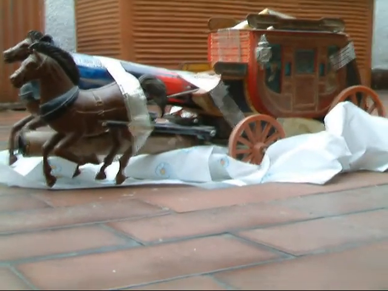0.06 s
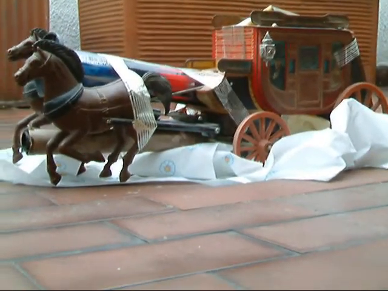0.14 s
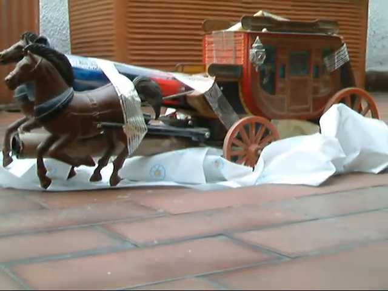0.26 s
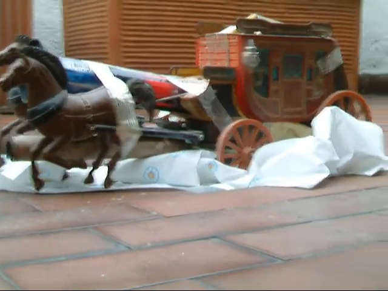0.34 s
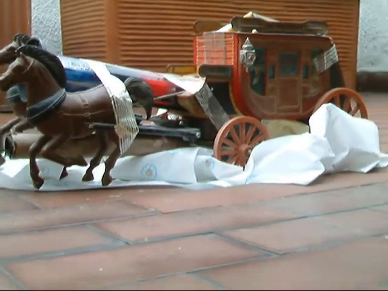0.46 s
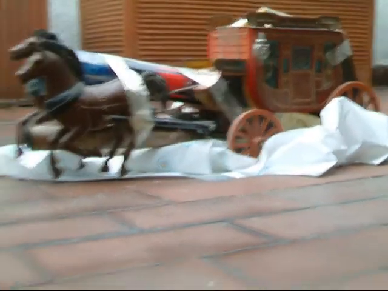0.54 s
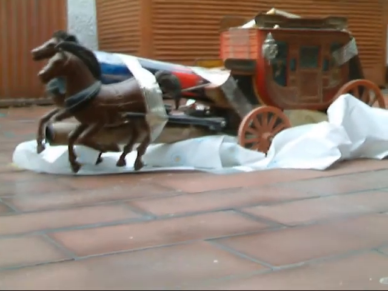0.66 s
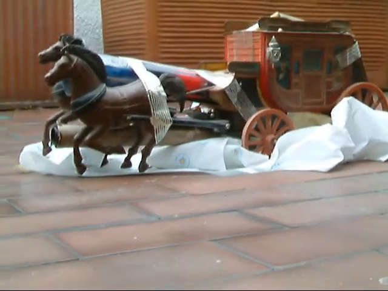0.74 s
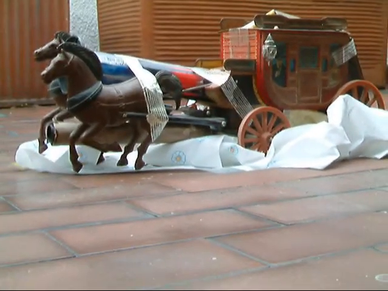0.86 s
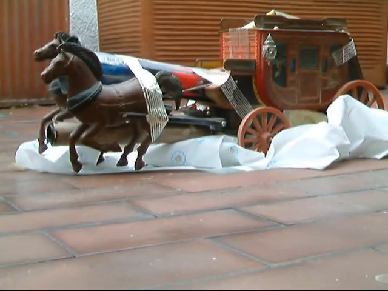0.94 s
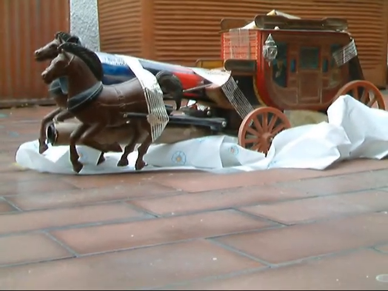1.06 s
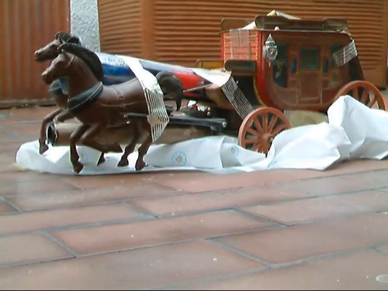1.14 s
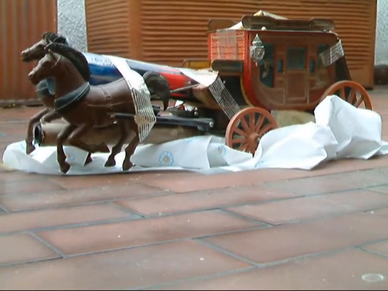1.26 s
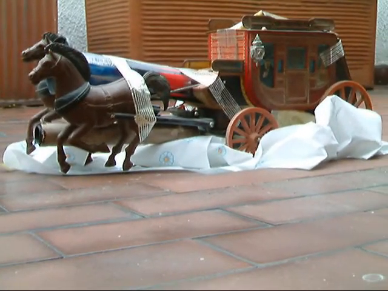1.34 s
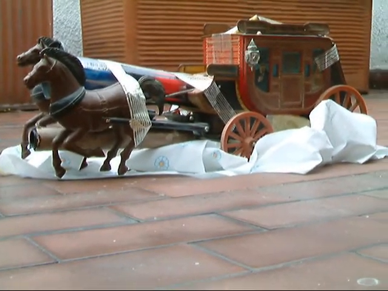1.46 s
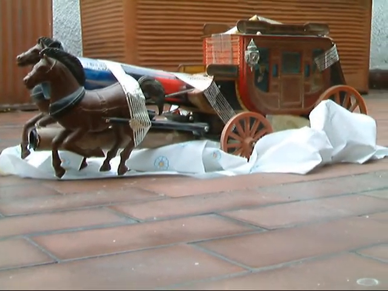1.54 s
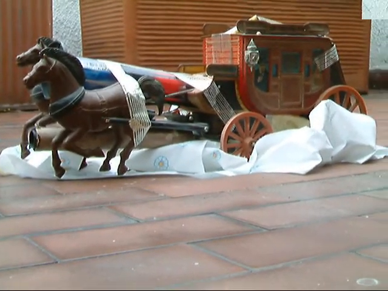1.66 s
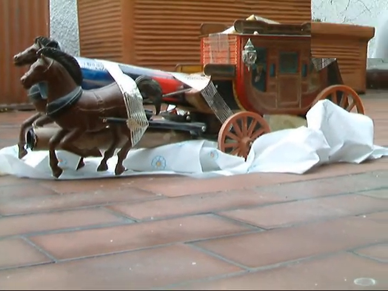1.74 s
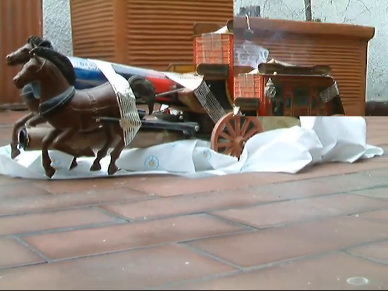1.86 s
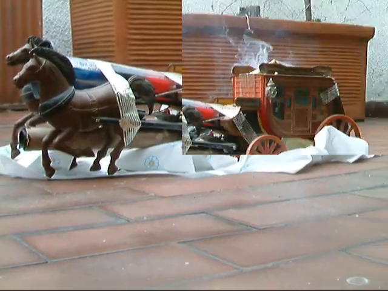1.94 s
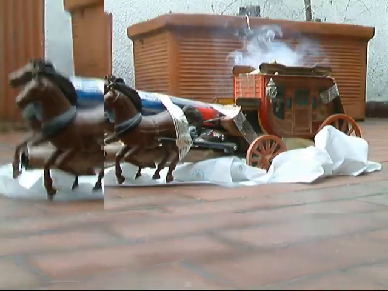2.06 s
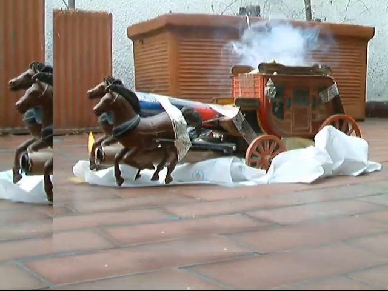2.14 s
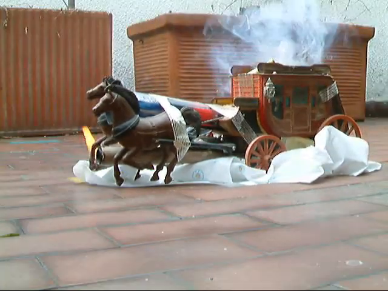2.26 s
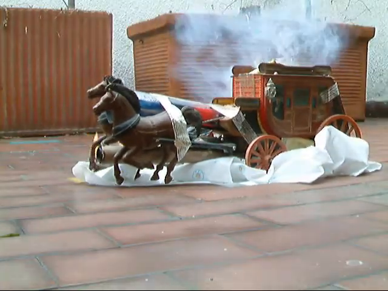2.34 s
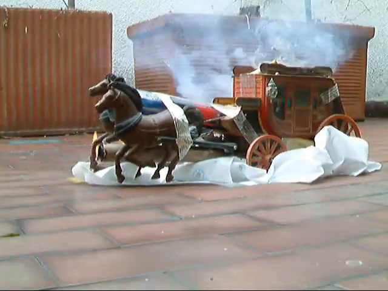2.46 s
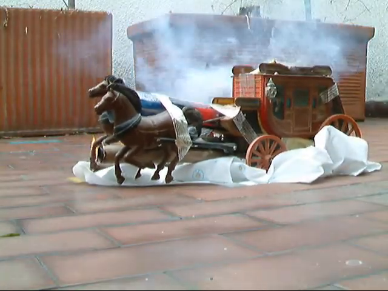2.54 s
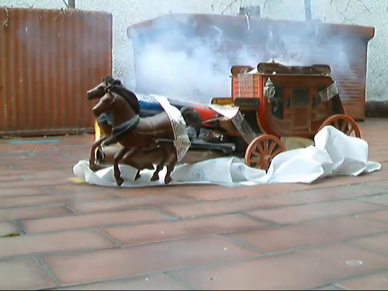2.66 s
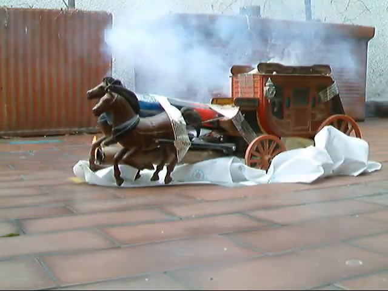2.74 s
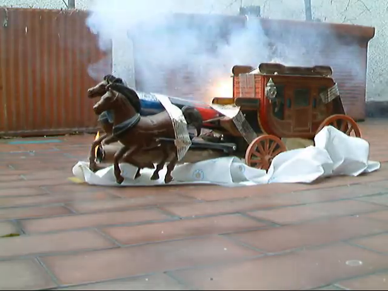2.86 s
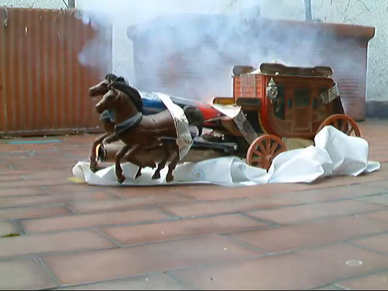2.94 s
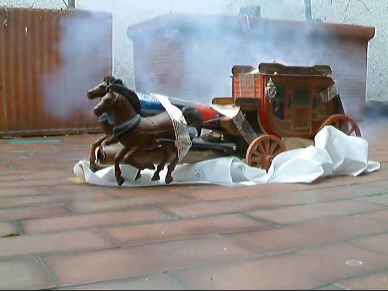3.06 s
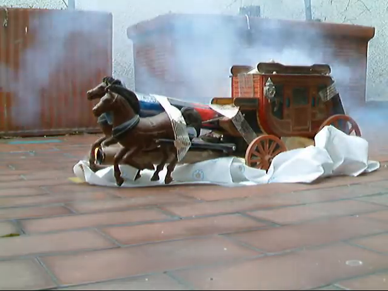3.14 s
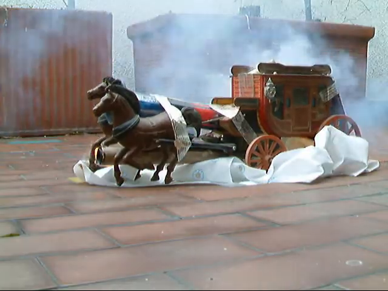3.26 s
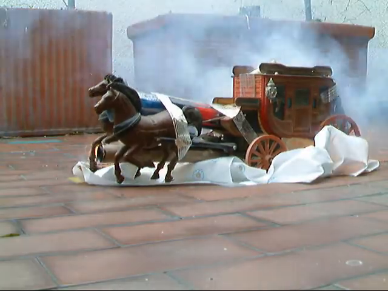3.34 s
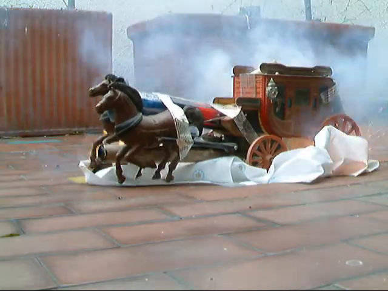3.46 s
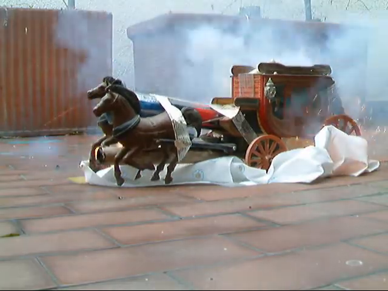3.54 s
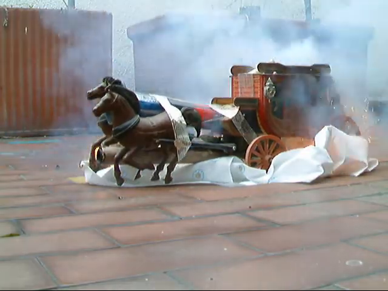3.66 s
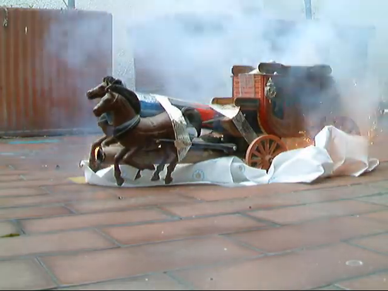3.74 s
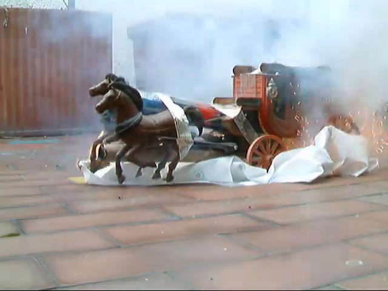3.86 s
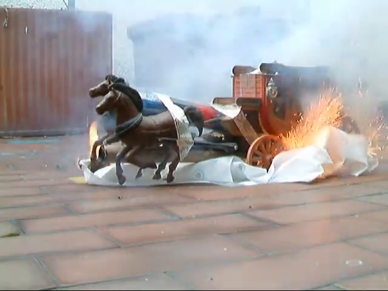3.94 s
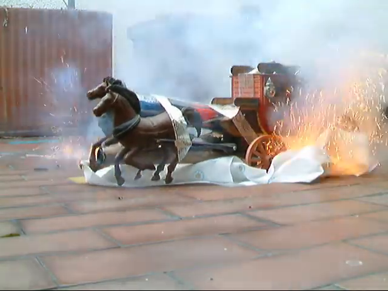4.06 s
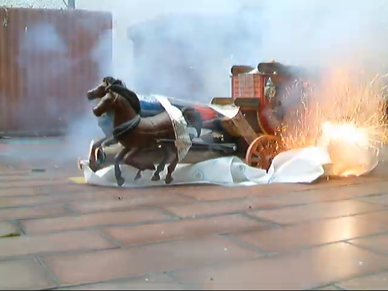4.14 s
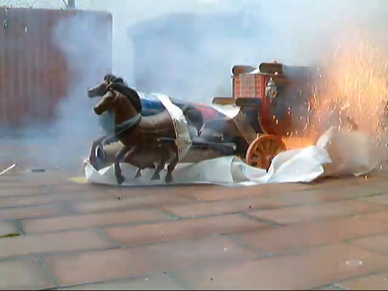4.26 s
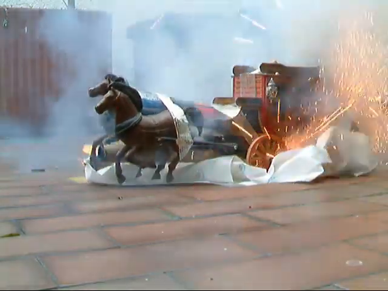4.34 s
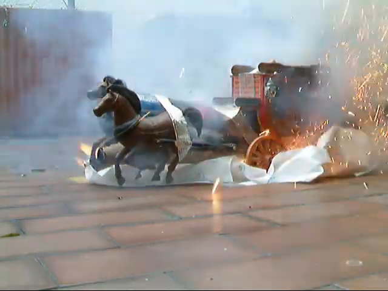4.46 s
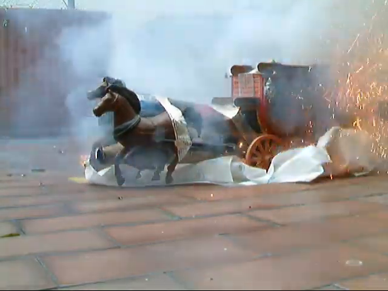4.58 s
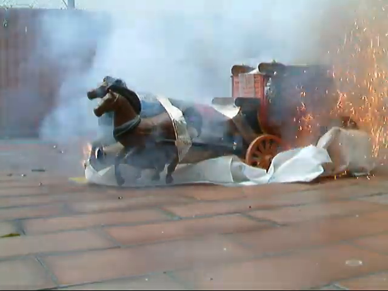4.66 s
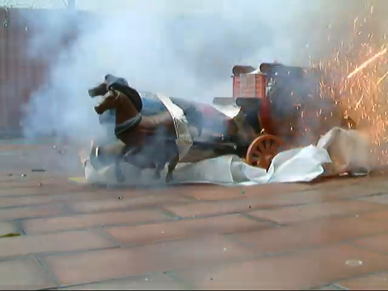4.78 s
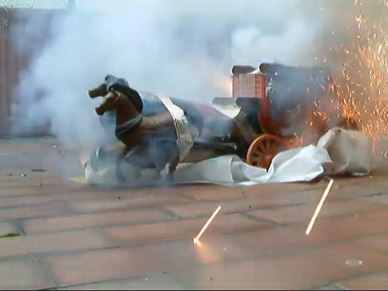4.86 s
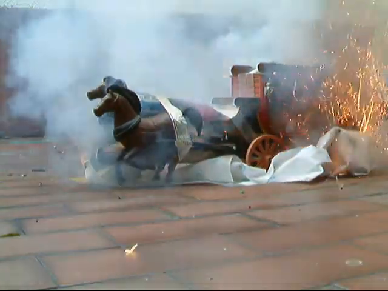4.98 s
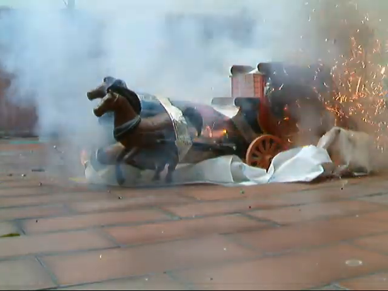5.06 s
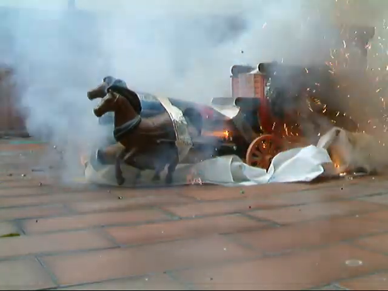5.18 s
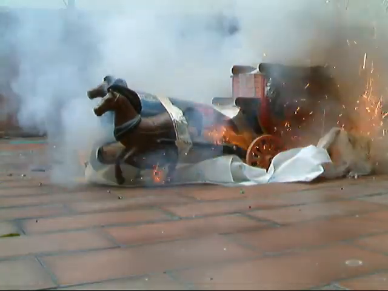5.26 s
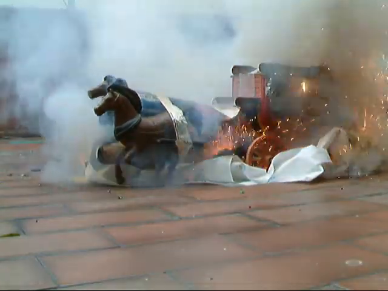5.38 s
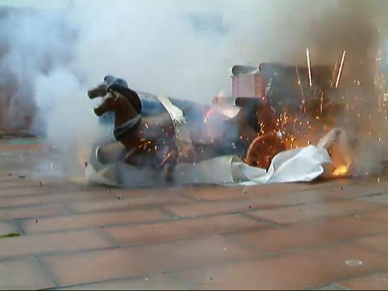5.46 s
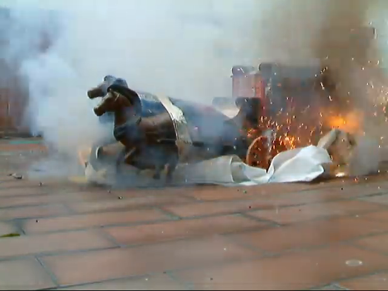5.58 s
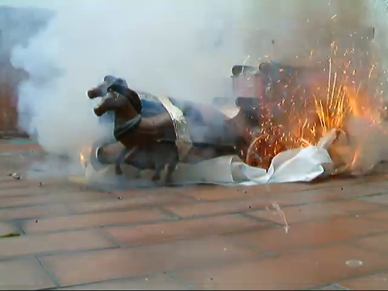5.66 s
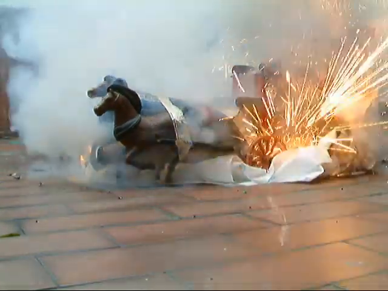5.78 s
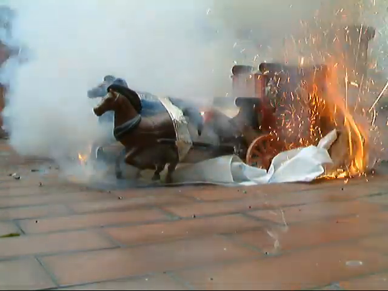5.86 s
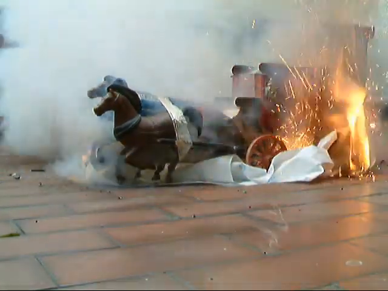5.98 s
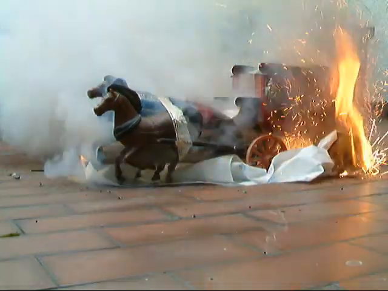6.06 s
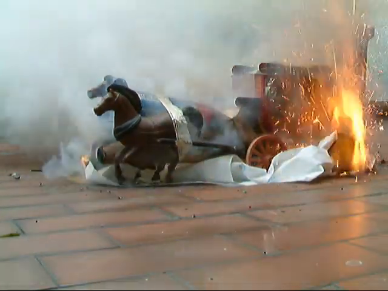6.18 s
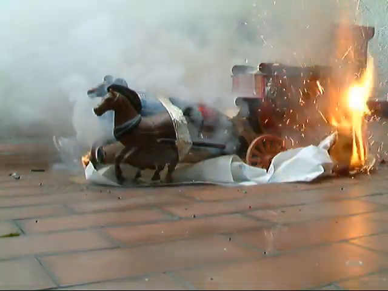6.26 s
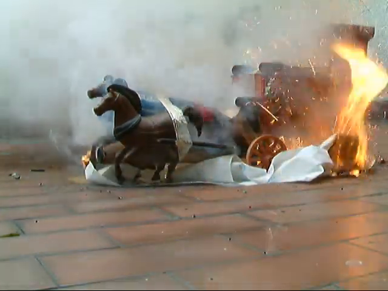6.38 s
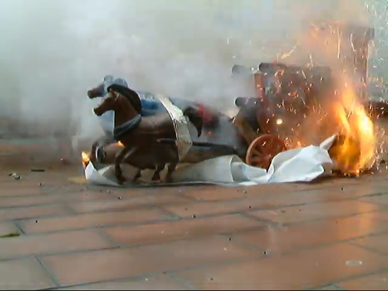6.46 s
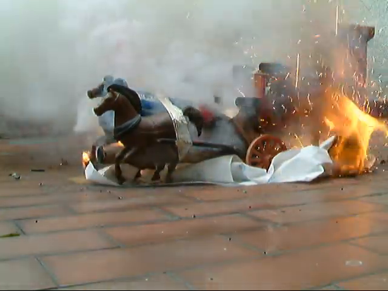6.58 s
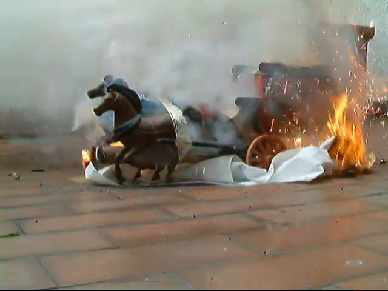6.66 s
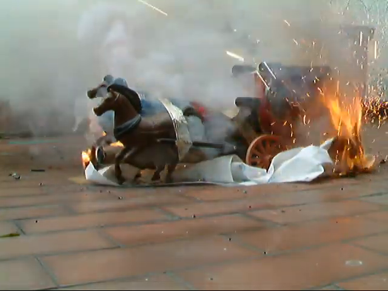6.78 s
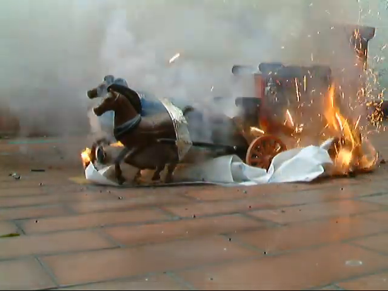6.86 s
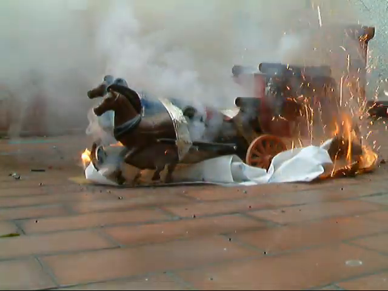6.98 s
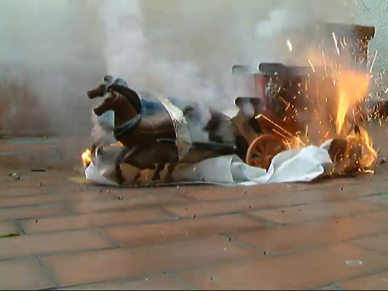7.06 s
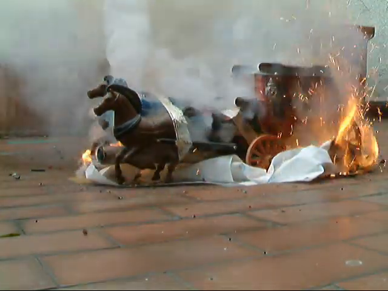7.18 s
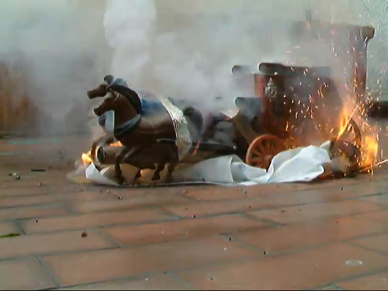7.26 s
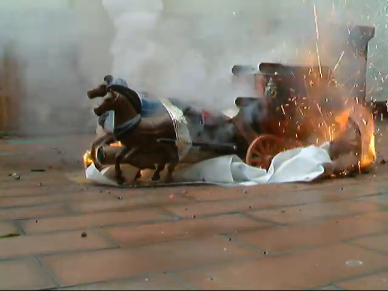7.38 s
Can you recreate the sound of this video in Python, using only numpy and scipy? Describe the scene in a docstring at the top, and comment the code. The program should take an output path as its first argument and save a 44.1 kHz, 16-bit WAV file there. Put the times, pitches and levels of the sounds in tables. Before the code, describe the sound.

Close to the microphone, a camera case scrapes and knocks over a quiet background. A fuse catches with a soft hollow puff and its hiss grows. One overloaded bang bursts out, followed by sharp single pops, then rapid crackling in fizzing sparks, with a few heavier bangs and tiny high whistles. Nearby walls throw back short, hard echoes on a tiled floor.

```python
"""Firecrackers on a toy stagecoach on a tiled floor, with close walls, heard through a camera's microphone.
First the camera is shifted with a scrape of small slips and a few knocks; a fuse catches with a hollow puff and hisses.
One big bang follows, then single pops, then a rapid crackle in a spray of sparks, with heavier bangs and short whistles.
Each charge is a pressure front thrown back by the walls and rung in the space; the fuse and sparks are noise with
random grains. A quiet background runs throughout, and the bangs overload the microphone's input."""
import sys
import numpy as np
from scipy import signal
from scipy.fft import next_fast_len
from scipy.io import wavfile
from scipy.ndimage import uniform_filter1d

SR = 44100
rng = np.random.default_rng(int(sys.argv[2]) if len(sys.argv) > 2 else 0)


def int16_out(signal):
    """Quantize to a 16-bit WAV file."""
    q = np.round(np.clip(np.atleast_2d(signal).T, -1, 1) * 32767)
    wavfile.write(sys.argv[1], SR, q.astype(np.int16))


N = 326781
TIME = np.arange(N) / SR


def gain_of(db):
    """Decibels to amplitude."""
    return 10 ** (np.asarray(db) / 20)


def evened(x):
    """Scales to rms 1."""
    return x / np.sqrt(np.mean(x ** 2) + 1e-20)


def read(points, hz):
    """Reads a table on a log-frequency axis."""
    f, value = np.transpose(points)
    return np.interp(np.log(hz + 1), np.log(f + 1), value)


def level(rows):
    """A dB curve as a gain, practically silent outside its span."""
    s, db = np.transpose(rows)
    return gain_of(np.interp(TIME, s, db, left=-120, right=-120))


def add(mix, s, sound):
    """Mixes a sound in at time s."""
    part = mix[round(s * SR):][:len(sound)]
    part += sound[:len(part)]


def humps(modes, hz):
    """The dB lift of a few resonances."""
    return sum(db / (1 + (2 * (hz - f) / width) ** 2) for f, width, db in modes)


def coloured(x, points, modes=(), bright_db=0):
    """Causal (minimum-phase) filter from a spectrum, its resonances and a treble tilt about 3 kHz."""
    size = next_fast_len(len(x))
    hz = abs(np.fft.fftfreq(size, 1 / SR))
    shelf = np.tanh(np.log2((hz + 1) / 3000)) / 2
    log_gain = np.log(gain_of(read(points, hz) + humps(modes, hz) + bright_db * shelf))
    response = np.exp(np.conj(signal.hilbert(log_gain)))
    return np.fft.ifft(np.fft.fft(x, size) * response).real[:len(x)]


def grains(per_s, spread_db):
    """Random clicks of unequal size and either sign."""
    size = gain_of(spread_db * np.minimum(rng.exponential(1, N), 4))
    struck = rng.random(N) < per_s / SR
    return evened(size * rng.choice([-1, 1], N) * struck)


def flicker(per_s, depth_db):
    """A gain that wavers at random."""
    knots = rng.standard_normal(4096)
    return gain_of(depth_db * np.interp(TIME * per_s, np.arange(len(knots)), knots))


# heavy charges, levels before the group's gain: (time [s], level [dB], brightness [dB])
HEAVY_CHARGES = [(2.9052, 3, 1.5), (4.3263, -7.5, 2), (4.5184, -10.5, 7), (4.8683, -11.5, 1.5)]
# spectrum of a heavy charge, relative: (frequency [Hz], density [dB per Hz])
HEAVY_COLOUR = [(40, -20), (110, -2), (190, -9), (370, -0.5), (550, -2.5), (820, -1), (1200, 3),
                (2000, 0.5), (3500, -4), (6000, -11), (8000, -19), (11000, -13.5), (16000, -22)]


def bangs():
    """Heavy charges: fuller low fronts with a strong direct sound and dense scatter."""
    return crackers(HEAVY_CHARGES, HEAVY_COLOUR, split_s=0.002, scatter_db=-1, gain_db=-0.6, tail_db=-9.5,
                    direct_db=7.0, shading_db=-2)


# firecrackers that stand out, levels before the group's gain: (time [s], level [dB], brightness [dB])
SINGLE_POPS = [(2.9315, -9, 3), (2.9554, -19, 6), (2.9846, -18, 12), (3.0289, -17, -9), (3.0471, -10, 0.5),
               (3.1945, -12, -4), (3.2256, -17.5, -2), (3.2498, -13.5, -8), (3.3481, -23, 0),
               (3.4603, -12.5, -2.5), (3.5551, -13.5, -3.5), (3.6081, -14, -3), (3.635, -13.5, 0.5),
               (3.7197, -16.5, -0.5), (3.7367, -15, -5), (3.7573, -16.5, -6), (3.782, -13.5, 2),
               (3.9795, -11.5, -5), (4.0043, -14, 1), (4.054, -16.5, -2), (4.089, -17, 1),
               (4.1148, -15.5, 1), (4.1569, -12, -3.5), (4.2221, -14.5, 1), (4.3505, -14, -8),
               (4.4444, -18, -4), (4.5477, -12.5, -7), (4.5627, -16.5, -11), (4.634, -20, -10),
               (4.6695, -19.5, -7), (4.6962, -17.5, -4), (4.7217, -12, -6.5), (4.8939, -12.5, -7),
               (4.9313, -19.5, -5), (4.9702, -16.5, 7), (4.9847, -18, -11), (5.1488, -16.5, -8),
               (5.163, -20.5, -2), (5.1881, -12.5, -2), (5.2258, -18, -11), (5.2496, -19, -4),
               (5.2836, -25, -10), (5.3145, -21.5, -6), (5.3564, -17, -11.5), (5.4186, -19, -10),
               (5.4611, -18.5, -10), (5.4927, -20, 0), (5.5918, -17.5, -4), (5.6835, -18, -2),
               (5.7026, -14.5, -1.5), (5.7447, -18.5, -7), (5.7678, -17.5, -8), (5.8235, -19, 0),
               (5.8834, -20, -12), (5.9238, -15, -4), (5.9873, -24.5, 2), (6.037, -25.5, 5),
               (6.0735, -15, -7), (6.1849, -15.5, -4), (6.2438, -19, -4), (6.2593, -16, 0),
               (6.3518, -24.5, 2), (6.3946, -21.5, -5), (6.4414, -13.5, 1), (6.5101, -16, -2),
               (6.5464, -19.5, 3), (6.5702, -18, -1), (6.6247, -19.5, -6), (6.7022, -20, -9),
               (6.7433, -17.5, -9), (6.7742, -17, 2), (6.7975, -19, -2), (6.8934, -22.5, -5),
               (6.9328, -14.5, -3.5), (6.9844, -17, 0.5), (7.0401, -21.5, -11), (7.1839, -18.5, 1),
               (7.3767, -23, -2)]
# spectrum of a small charge, relative: (frequency [Hz], density [dB per Hz])
SMALL_COLOUR = [(40, -21), (120, -18), (250, -17), (450, -9), (750, -5.5), (1200, -2.5), (2000, 0),
                (3500, -1.5), (6000, -5), (8000, -12.5), (10300, -9.5), (13500, -13), (16000, -20.5)]


def pops():
    """Single small charges: short, bright fronts."""
    return crackers(SINGLE_POPS, SMALL_COLOUR, split_s=0.00061, scatter_db=-4.5, gain_db=-0.86, tail_db=-5.0,
                    direct_db=0.0, shading_db=4.5)


def crackle():
    """Rapid small charges among the sparks, their direct sound strongly shaded."""
    return crackers(small_charges(), SMALL_COLOUR, split_s=0.001, scatter_db=-6.5, gain_db=-0.5, tail_db=-3.5,
                    direct_db=-0.5, shading_db=9)


# strength of the spray of sparks, before a common gain: (time [s], level [dB])
SPARK_LEVEL = [(3.95, -49), (4.1, -29), (4.72, -27.5), (5.1, -34), (5.3, -31), (5.75, -33.5), (6.02, -35.5),
               (6.38, -40.5), (6.6, -30.5), (6.92, -32.5), (7.15, -49)]
# small crackers follow the strength of the spray
CRACKLE_PER_S, LULL_S = 30, .02
CRACKLE_OVER_SPARKS_DB, CRACKLE_SPREAD_DB = 7, 3.5
CRACKLE_BRIGHT_DB, CRACKLE_BRIGHT_SPREAD_DB = -8, 5


def small_charges(count=90):
    """Rows (time, level, brightness): fire eats the string unevenly, with a lull before each heavy charge."""
    late, size, tone = rng.standard_normal((count, 3)).T
    start_s = SPARK_LEVEL[1][0]
    s = start_s + (np.arange(count) + .35 * late) / CRACKLE_PER_S
    spray_db = np.interp(s, *np.transpose(SPARK_LEVEL))
    db = spray_db + CRACKLE_OVER_SPARKS_DB + CRACKLE_SPREAD_DB * size
    wait = np.array([row[0] for row in HEAVY_CHARGES]) - s[:, None]
    in_lull = ((wait > 0) & (wait < LULL_S)).any(1)
    db = np.where(in_lull, -120, db)
    return np.transpose([s, db, CRACKLE_BRIGHT_DB + CRACKLE_BRIGHT_SPREAD_DB * tone])


def crackers(rows, colour, split_s, scatter_db, gain_db, tail_db, direct_db, shading_db):
    """Fires charges; the toy shades each direct sound by chance, and three spots in turn ring the space."""
    near, spots = np.zeros(N), np.zeros((3, N))
    for k, (s, db, bright_db) in enumerate(rows):
        front = shock(colour, bright_db, swing_hz=3700)
        shaded_db = direct_db + shading_db * rng.uniform(-1.23, 1)
        sound = signal.fftconvolve(front, paths(shaded_db, split_s, scatter_db))
        # the level is the rms of the first 10 ms
        sound *= gain_of(db + gain_db) / np.sqrt(np.mean(sound[:SR // 100] ** 2))
        add(near, s, sound)
        # the space receives the bare front with the same energy
        add(spots[k % len(spots)], s, front * np.linalg.norm(sound) / np.linalg.norm(front))
    return near + gain_of(tail_db) * sum(space(spot) for spot in spots)


def shock(colour, bright_db, swing_hz, size=1024):
    """One pressure front; an all-pass swings its overpressure into an equal suction."""
    pole = np.exp(-2 * np.pi * swing_hz / SR)
    front = coloured(signal.unit_impulse(size), colour, bright_db=bright_db)
    return signal.lfilter([pole, -1], [1, -pole], front)


# echoes from the planter and the nearest walls, before random variation: (delay [s], level [dB])
WALL_ECHOES = [(.00495, 2), (.0055, -10.5), (.008, -5.5), (.0098, -6.5), (0.014, -4.5), (0.0162, -10.5)]


def paths(direct_db, split_s, scatter_db, size=3072):
    """Ways from a charge to the microphone: direct, off the walls, and scattered by nearby things."""
    t = np.arange(size) / SR
    out = np.zeros(size)
    arrivals = [(0.00013, direct_db + 3.0)]
    # each cracker lies in a slightly different place
    for s, db in WALL_ECHOES:
        arrivals.append((abs(s + .0001 * rng.standard_normal()), db + 2 * rng.standard_normal()))
    for s, db in arrivals:
        # the toy's body splits every front into a short burst of copies
        copies = rng.standard_normal(size) * (rng.random(size) < .25)
        split = copies * np.exp(-t / split_s) * gain_of(-12)
        split[0] = 1
        add(out, s, gain_of(db) * split)
    scatter = rng.standard_normal(size) * np.exp(-t / 0.0066) * np.interp(t, [.004, .007], [.25, 1])
    return out + gain_of(scatter_db) * scatter * np.linalg.norm(out) / np.linalg.norm(scatter)


# resonances between floor and walls: (frequency [Hz], width [Hz], lift [dB])
ROOM_MODES = [(366, 43, 7.5), (487, 65, 4), (1006, 22, 11.5), (1270, 57, 4.5), (1594, 33, 7.5),
              (3080, 40, 1), (3330, 40, 4.5)]
# time the tail takes to fall by 60 dB: (frequency [Hz], decay [s])
ROOM_DECAY = [(100, 0.28), (400, 0.2), (1500, 0.34), (4000, 0.49), (8000, 0.45), (15000, 0.43)]


def space(x, rise_s=0.011):
    """A diffuse tail: sparse taps that build up, then die band by band."""
    taps = rng.standard_normal(SR) * (rng.random(SR) < .15)
    hz, t, z = signal.stft(taps, SR, nperseg=256)
    decay = gain_of(-60 * t / read(ROOM_DECAY, hz)[:, None])
    tail = signal.istft(z * decay, SR, nperseg=256)[1][:SR]
    tail *= np.minimum(np.arange(SR) / SR / rise_s, 1) ** 2
    tail_colour = [(100, -2), (600, 1.5), (2500, 0.5), (6000, 0.5), (14000, 0.5)]  # (Hz, dB)
    tail = coloured(tail, tail_colour, ROOM_MODES)
    return signal.fftconvolve(x, tail / np.linalg.norm(tail))[:N]


# the fuse grows, then dies away from just before the first bang; before a common gain: (time [s], level [dB])
FUSE_LEVEL = [(1.8, -60), (1.836, -51), (2.06, -37), (2.716, -30.5), (2.758, -28.5), (2.89, -30.5)]
# spectrum of the fuse, relative: (frequency [Hz], density [dB per Hz])
FUSE_SPECTRUM = [(30, -7), (75, 10), (130, -11), (260, -2.5), (380, -5.5), (600, -1), (900, -0.5),
                 (2000, -1), (3600, -5.5), (6000, -11), (8000, -19), (10200, -14.5), (14000, -17),
                 (16000, -20)]
# spectrum of the sparks, relative: (frequency [Hz], density [dB per Hz])
SPARK_SPECTRUM = [(40, 6), (120, -6.5), (270, -18), (450, -8), (750, -8), (1200, -15), (2000, -4.5),
                  (3500, -4.5), (6000, -10), (8000, -13), (10300, -10), (16000, -12)]
FUSE_DIES_DB_PER_S = 64


def burning():
    """Fuse and sparks: a fluttering jet of gas with tiny bursting grains."""
    jet = evened(rng.standard_normal(N) + .5 * grains(per_s=1300, spread_db=3.5))
    fuse = evened(coloured(jet, FUSE_SPECTRUM, ROOM_MODES)) * flicker(per_s=45, depth_db=1.0)
    spray = rng.standard_normal(N) + 1.5 * grains(per_s=500, spread_db=4.5)
    sparks = evened(coloured(spray, SPARK_SPECTRUM, ROOM_MODES)) * flicker(per_s=40, depth_db=2)
    last_s, last_db = FUSE_LEVEL[-1]
    burn = level(list(FUSE_LEVEL) + [(last_s + 1, last_db - FUSE_DIES_DB_PER_S)])
    return fuse * burn * gain_of(0.05) + sparks * level(SPARK_LEVEL) * gain_of(-2.0)


PUFF_S, PUFF_LENGTH_S, PUFF_HZ, PUFF_DB = 1.92, 0.18, 370, -42  # level at the crest of the swell


def puff(width_hz=130):
    """A soft, hollow rush of gas as the fuse catches: band-passed noise that swells and fades."""
    t = np.arange(0, PUFF_LENGTH_S, 1 / SR)
    band = [PUFF_HZ - width_hz / 2, PUFF_HZ + width_hz / 2]
    hollow = signal.butter(2, band, "bandpass", fs=SR, output="sos")
    rush = signal.sosfilt(hollow, rng.standard_normal(N))
    swell = np.interp(TIME, PUFF_S + t, np.sin(np.pi * t / PUFF_LENGTH_S), right=0)
    return gain_of(PUFF_DB) * evened(rush) * swell


# gas from a narrow vent, level before the fades:
# (time [s], length [s], pitch [Hz], level [dB], share of pitch lost at the end [fraction])
VENT_WHISTLES = [(4.083, 0.067, 4040, -26, 0), (4.213, .11, 4010, -27.5, .06),
                 (6.426, .085, 3990, -26, .04)]
# the pitch climbs as the pressure builds and sags as it runs out; the flat start is a share of the pitch
WHISTLE_RISE_S, WHISTLE_START_FLAT, WHISTLE_SAG_S = .01, 0.046, 0.025


def whistles(second_db, third_db, waver):
    """A wavering tone with mostly odd overtones, as from a tube closed at one end."""
    out = np.zeros(N)
    wobble = 1 + waver * evened(uniform_filter1d(rng.standard_normal(N), size=150))
    for s, length, hz, db, sag in VENT_WHISTLES:
        t = np.arange(0, length, 1 / SR)
        building = np.exp(-t / WHISTLE_RISE_S)
        spent = np.clip(1 - (length - t) / WHISTLE_SAG_S, 0, 1)
        pitch = hz * (1 - WHISTLE_START_FLAT * building - sag * spent) * wobble[:len(t)]
        phase = 2 * np.pi * np.cumsum(pitch) / SR
        tone = np.sin(phase) + gain_of(second_db) * np.sin(2 * phase) + gain_of(third_db) * np.sin(3 * phase)
        fades = (1 - building) * signal.windows.tukey(len(t), .1)
        add(out, s, evened(tone) * gain_of(db) * fades)
    return out


# speed of the sliding camera, as a level: (time [s], level [dB])
SLIDE_SPEED = [(.1, -58), (.42, -46), (.62, -31), (.665, -23.5), (.72, -29.5), (.8, -35), (.84, -45),
               (1.1, -66)]
# spectrum of the scrape and rattle, relative: (frequency [Hz], density [dB per Hz])
SCRAPE_SPECTRUM = [(40, -9), (110, 1.5), (280, -6), (600, -5.5), (1000, -3), (1700, -6.5), (3000, -14),
                   (5000, -17), (8000, -25), (10500, -19.5), (14000, -21), (16000, -24)]
# resonances of the camera's case: (frequency [Hz], width [Hz], lift [dB])
CASE_MODES = [(920, 230, 10.4), (1404, 160, 9), (1680, 130, 6.5), (2730, 550, 8.7), (4030, 280, 4.8),
              (4830, 180, 2.6), (6300, 400, 9.1)]
# drift of the scrape's pitch, case resonances included, as the grip changes: (time [s], factor [ratio])
GRIP_DRIFT = [(.45, 1.01), (.58, .95), (.71, 1.06)]
# knocks on the camera, peaks before a common gain: (time [s], rattle level [dB], low thud level [dB])
CASE_KNOCKS = [(0.049, -33, -62), (0.194, -32.5, -58), (0.635, -14.5, -60), (0.6947, -12, -23),
               (0.713, -35, -27.5), (.728, -21.5, -47), (0.741, -30, -31.5), (1.31, -38, -62)]


def handling(ring_s=0.0045, thud_s=0.017, speed_ref_db=-27, size=4096):
    """The camera's case scrapes in small slips, brighter when faster, with knocks of rattle and thud."""
    slips = grains(per_s=3500, spread_db=-1.0) * flicker(per_s=260, depth_db=2.0)
    speed = level(SLIDE_SPEED)
    fast = np.clip(speed / gain_of(speed_ref_db), 0, 1) ** 2
    # reading the scrape faster or slower shifts its resonances
    place = np.cumsum(np.interp(TIME, *np.transpose(GRIP_DRIFT)))
    dull, bright = (np.interp(place, np.arange(N), evened(coloured(slips, SCRAPE_SPECTRUM, CASE_MODES, db)))
                    for db in (0, 10))
    out = speed * ((1 - fast) * dull + fast * bright)
    t = np.arange(size) / SR
    thud_colour = [(30, -18), (80, 7), (180, -20), (380, -3), (900, -13), (5000, -72)]  # (Hz, dB)
    for s, rattle_db, thud_db in CASE_KNOCKS:
        burst = rng.standard_normal(size) * t * np.exp(-2 * t / ring_s)
        rattle = coloured(burst, SCRAPE_SPECTRUM, CASE_MODES, bright_db=-3.0)
        thud = coloured(rng.standard_normal(size) * np.exp(-t / thud_s), thud_colour)
        for sound, peak_db in (rattle, rattle_db), (thud, thud_db):
            add(out, s, gain_of(peak_db + 4.5) * sound / abs(sound).max())
    return out


# spectrum of the background, relative: (frequency [Hz], density [dB per Hz])
AIR_SPECTRUM = [(25, -20), (45, -8), (70, -2), (130, -2.5), (195, -1), (260, -6), (600, -7), (1400, -8.5),
                (2200, -15), (6500, -19), (10000, -23), (15500, -30)]
AIR_DB = -45.5  # rms before the flicker


def air():
    """The quiet background: coloured noise with a slightly unsteady level."""
    noise = evened(coloured(rng.standard_normal(N), AIR_SPECTRUM))
    return gain_of(AIR_DB) * noise * flicker(per_s=36, depth_db=1.35)


def scene():
    """Charges and whistles in their space, over the fuse, the handling and the background."""
    charges = bangs() + pops() + crackle()
    whistle = whistles(second_db=-27, third_db=-11, waver=.003)
    whistle_tail = gain_of(-14) * space(whistle)
    return (charges + whistle + whistle_tail + burning() + puff() + handling() + air())[None]


EDGE_HZ = 15600  # upper band limit


def record(dry):
    """The microphone's input stage sits off centre and overloads on the bangs; then the band limit."""
    biased = dry - .077
    clipped = biased / (1 + biased ** 8) ** (1 / 8)
    lowpass = signal.firwin(401, EDGE_HZ, window=("kaiser", 7), fs=SR)
    return signal.oaconvolve(clipped, lowpass[None], "same")


dry = scene()
out = record(dry)
int16_out(out)
```